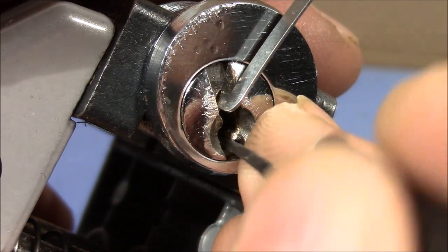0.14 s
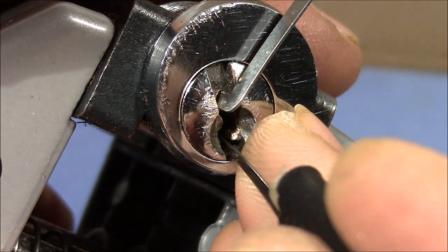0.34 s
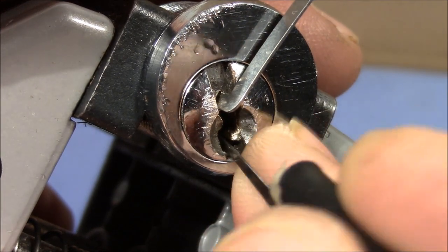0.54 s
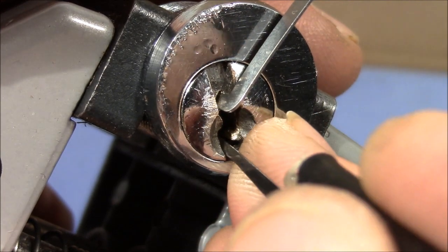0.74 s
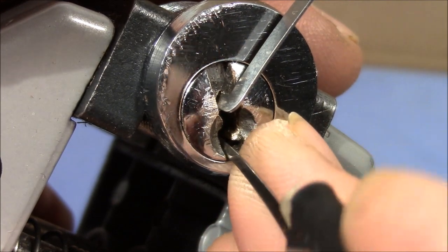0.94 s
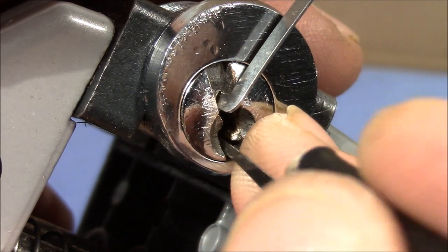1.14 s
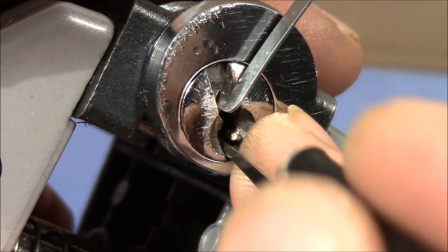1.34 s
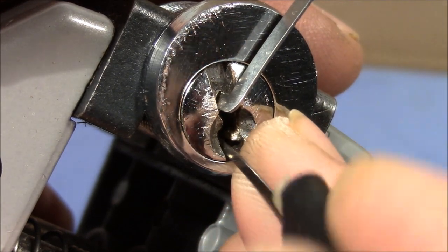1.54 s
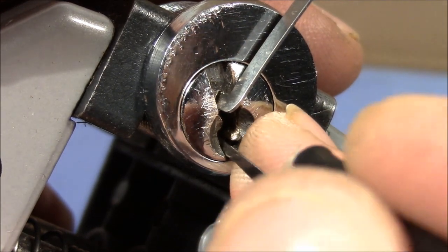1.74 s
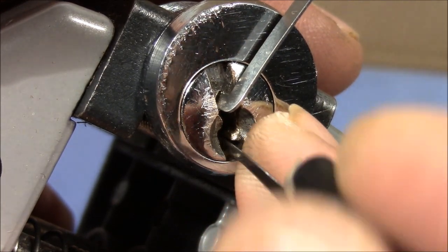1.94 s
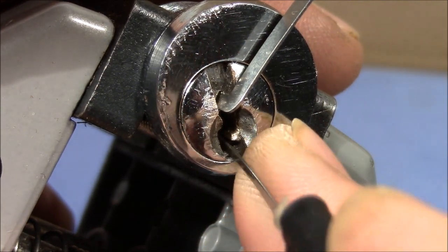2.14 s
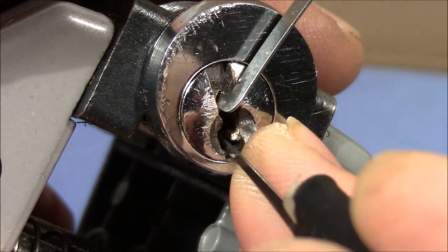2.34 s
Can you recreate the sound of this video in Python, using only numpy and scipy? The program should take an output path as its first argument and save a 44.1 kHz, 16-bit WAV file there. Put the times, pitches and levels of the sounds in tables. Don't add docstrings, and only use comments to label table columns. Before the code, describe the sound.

A thin metal pick clicks sharply on lock pins, with small ticks, in a quiet room

```python
import sys
import numpy as np
from scipy import signal
from scipy.fft import rfft, irfft, next_fast_len
from scipy.io import wavfile

SR = 44100
rng = np.random.default_rng(int(sys.argv[2]) if len(sys.argv) > 2 else 0)


def generate_wav(signal):
    frames = np.transpose(np.atleast_2d(signal))
    scaled = np.clip(frames, -1, 1) * 32767
    pcm = np.round(scaled).astype(np.int16)
    wavfile.write(sys.argv[1], SR, pcm)


def magnitude_from_level(level_db):
    exponent = np.asarray(level_db, float) / 20
    return 10 ** exponent


N = 105840
PAD = SR // 5


def along(points, hz):
    f, value = np.transpose(points)
    return np.interp(np.log(hz + 1), np.log(f + 1), value)


def filtered(x, response):
    size = next_fast_len(x.shape[-1] + 8192)
    spectrum = rfft(x, size) * response(np.fft.rfftfreq(size, 1 / SR))
    return irfft(spectrum, size)[..., :x.shape[-1]]


def pair(noise, alike):
    def turn(hz):
        return np.arccos(np.clip(alike(hz), -1, 1)) / 2

    mid, side = filtered(noise, lambda hz: np.array([np.cos(turn(hz)), np.sin(turn(hz))]))
    return np.array([mid + side, mid - side])


def ring(modes, t, rise_s):
    scatter_db, detune = 2, 0.015
    hz, db, t60 = np.transpose(modes)[..., None]
    chance = rng.standard_normal((2, len(modes), 1))
    envelope = magnitude_from_level(db + scatter_db * chance[0] - 60 * t / np.abs(t60))
    tones = envelope * np.sin(2 * np.pi * hz * (1 + detune * chance[1]) * t)
    return tones.sum(axis=0) * (1 - np.exp(-t / rise_s))


def play(events):
    track = np.zeros((2, N + PAD + SR))
    for s, sound in events:
        start = PAD + round(s * SR)
        track[:, start:start + sound.shape[-1]] += sound
    return track[:, PAD:PAD + N]


# f/Hz, rms level/dB
HUM_TONES = [(100, -71.5), (200, -78)]


def hum():
    t = np.arange(N) / SR
    return sum(np.sqrt(2) * magnitude_from_level(db) * np.sin(2 * np.pi * hz * t) for hz, db in HUM_TONES)


# f/Hz, spectral level/dB
HISS_SPECTRUM = [(30, -25), (85, -16), (125, -9), (190, -3), (1470, -16), (6000, -25), (12500, -34),
                 (16500, -47.5)]
# f/Hz, left-right likeness/1
HISS_LIKENESS = [(50, 0.7), (100, .9), (300, .35), (1400, 0.91), (3100, .6), (7000, .75), (15000, 0.85)]


def hiss():
    noise = pair(rng.standard_normal((2, N)), lambda hz: along(HISS_LIKENESS, hz))
    noise = filtered(noise, lambda hz: magnitude_from_level(along(HISS_SPECTRUM, hz)))
    return magnitude_from_level(-67) * noise / np.sqrt(np.mean(noise ** 2))


# f/Hz, T60/s
WALL_T60 = [(200, .35), (1000, .38), (3000, .3), (7000, .25), (14000, .2)]
# f/Hz, level/dB
WALL_LEVEL = [(200, -2), (600, 2.5), (1000, -2.5), (1900, -13.5), (3300, -18.5), (7000, -28),
              (11000, -28.5), (15000, -31.5)]


def room(x):
    gap_s, likeness = 0.002, 0.85
    hz, t, z = signal.stft(rng.standard_normal((2, SR // 2)), SR, nperseg=256)
    decay = magnitude_from_level(-60 * t / along(WALL_T60, hz)[:, None])
    decay = decay / np.sqrt(np.sum(decay ** 2, axis=1, keepdims=True) * 128)
    decay = decay * magnitude_from_level(along(WALL_LEVEL, hz))[:, None]
    tail = signal.istft(z * decay, SR, nperseg=256)[1][:, :SR // 2]
    tail = pair(tail, lambda f: likeness + 0 * f)
    delayed = np.pad(x, (round(gap_s * SR), 0))
    return signal.fftconvolve(delayed[None], tail, axes=1)


# f/Hz, level re snap/dB, T60/s
PIN_MODES = [(6110, -14, 0.0084), (7650, -31, .012), (9470, -16.5, .008), (10240, -5.5, 0.0024),
             (11430, -21.5, 0.0029), (15400, -18, .005), (16500, -28.5, .005)]
# f/Hz, level/dB, T60/s
BODY_MODES = [(480, -12, .03), (690, -8, .035), (960, -2, .026), (1100, 0, .024), (1380, -8, .024)]
# f/Hz, level/dB
CRACK_SPECTRUM = [(1000, -22.5), (3000, -5), (7000, 0), (12000, -3), (16000, -6)]


def contact(db, snap_hz, body_db, middle_db, middle_modes):
    snap_rise_s, snap_t60 = 0.00025, 0.003
    crack_t60, rattle_t60, blur_t60 = 0.004, 0.03, 0.014
    crack_db, rattle_db, spread_db = -6.5, -27, -6
    t = np.arange(SR // 20) / SR

    grit = filtered(rng.standard_normal(len(t)), lambda f: magnitude_from_level(along(CRACK_SPECTRUM, f)))
    crack = magnitude_from_level(db - 60 * t / crack_t60) * grit
    rattle = magnitude_from_level(db + rattle_db - 60 * t / rattle_t60) * grit

    t60 = max(snap_t60 + 0.00012 * db, 0.0016)
    swell = (1 - np.exp(-t * snap_t60 / t60 / snap_rise_s)) ** 2 * magnitude_from_level(-60 * t / t60)
    pin = swell / swell.max() * np.sin(2 * np.pi * snap_hz * t)
    snap = magnitude_from_level(db) * (pin + ring(PIN_MODES, t, snap_rise_s / 2))
    snap = snap + magnitude_from_level(crack_db) * crack + rattle

    body = magnitude_from_level(db + body_db + 5.5) * ring(BODY_MODES, t, 0.0006)
    body = body + magnitude_from_level(db + middle_db + 4) * ring(middle_modes, t, 0.0002)

    sound = room((snap + body) * magnitude_from_level(-60 * t / blur_t60) + magnitude_from_level(spread_db) * crack)
    side = np.array([[0.5], [-0.5]])
    sound[:, :len(t)] += snap * magnitude_from_level(-2 * side) + body * magnitude_from_level(1.44 * side)
    return sound


CONTACT_LEAD_S = 0.0013
# f/Hz, level/dB, T60/s
PLUG_MODES = [(1850, 0, .018), (2200, -5, .013), (2850, -4, .013), (3300, -2, .013), (3680, -4, .011),
              (4500, -6, .01)]


def earlier_click():
    return play([(-0.11 + CONTACT_LEAD_S, contact(-17, 7000, -5.5, -5.5, PLUG_MODES))])


# t/s, peak level/dB
PUSHES = [(0.032, -63), (0.201, -44.5), (0.298, -76.5), (0.475, -63.5), (0.56, -50), (1.066, -61),
          (1.108, -60), (1.2, -53), (1.252, -57.5), (1.529, -59), (1.551, -56.5), (1.586, -60.5),
          (1.896, -55.5), (2.102, -40), (2.128, -39), (2.289, -58)]
# f/Hz, level/dB, T60/s
BENCH_MODES = [(135, 14, 0.027), (212.4, 4.5, 0.11), (260.4, 2.5, .05), (335, -8.5, 0.089)]


def thuds():
    lead_s, bench_db, rise_s = 0.0023, -2.5, 0.001
    t = np.arange(SR // 5) / SR
    return play([(s + lead_s, magnitude_from_level(db + bench_db) * ring(BENCH_MODES, t, rise_s)) for s, db in PUSHES])


# t/s, peak level/dB, snap f/Hz, lock body re snap level/dB, blade re snap level/dB
LIGHT_CONTACTS = [(0.1144, -43, 7600, -19.5, -13), (0.1772, -42.5, 7000, -29, -10.5),
                  (0.1858, -46.5, 7875, -34, -5), (0.4484, -41.5, 7270, -20, 0.5),
                  (0.5771, -36, 7440, -16, -14), (1.071, -32.5, 7100, -35, -28),
                  (1.0824, -58, 5700, -12, -14.5), (1.197, -30.5, 7900, -26, -14.5),
                  (1.2531, -49, 9800, -11, -3), (1.8973, -43.5, 7650, -29.5, -12.5),
                  (1.9, -52, 7650, -5, 3), (2.1783, -41.5, 7200, -13, -26), (2.2151, -67, 6940, 2, 5),
                  (2.2879, -46, 6000, -14.5, -10), (2.3266, -54, 7200, -15, -19)]
# f/Hz, level/dB, T60/s
BLADE_MODES = [(1700, -6, .012), (2050, -4, .012), (2400, -1, .012), (3050, -3, .011), (3650, -4, .01),
               (4300, -7, .009), (5050, -23, .03)]


def ticks():
    return play([(s + CONTACT_LEAD_S, contact(*levels, BLADE_MODES)) for s, *levels in LIGHT_CONTACTS])


# t/s, peak level/dB, snap f/Hz, lock body re snap level/dB, plug re snap level/dB
HARD_CONTACTS = [
    (.2043, -2.5, 6800, -28, -28.5),
    (.5583, -29.5, 7500, -8.5, -6),
    (2.1038, -16.5, 6600, -17.5, -9.5),
    (2.1274, -6.5, 6950, -33.5, -21.5),
]


def sets():
    return play([(s + CONTACT_LEAD_S, contact(*levels, PLUG_MODES)) for s, *levels in HARD_CONTACTS])


def scene():
    low_cut_hz = 95
    background = hum() + hiss()
    struck = sets() + earlier_click() + ticks() + thuds()
    return background + filtered(struck, lambda hz: (1j * hz / (low_cut_hz + 1j * hz)) ** 4)


def band_limit(x):
    return signal.sosfilt(signal.butter(12, 17150, fs=SR, output="sos"), x)


def record(dry):
    top_hz = 16400
    mix = filtered(dry, lambda hz: 1 / np.sqrt(1 + (hz / top_hz) ** 60))
    return band_limit(mix)


dry = scene()
out = record(dry)
generate_wav(out)
```